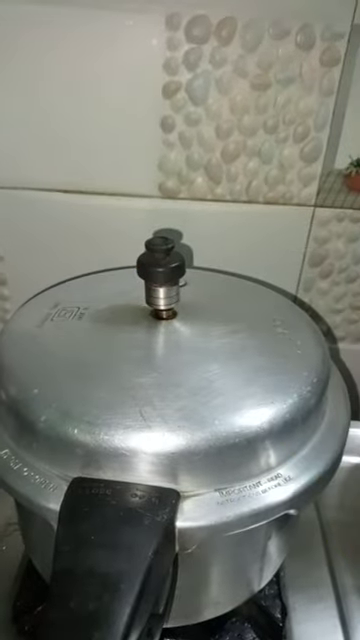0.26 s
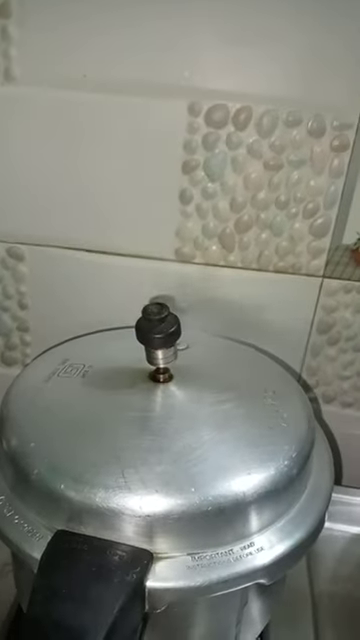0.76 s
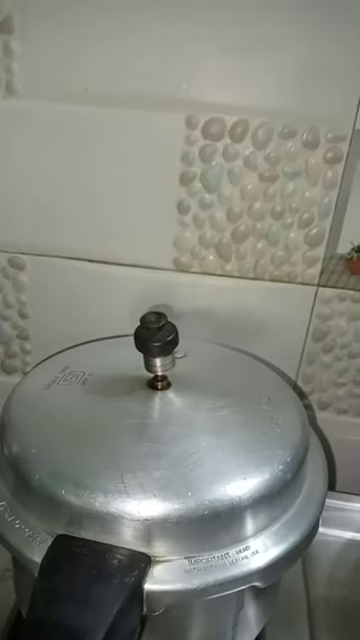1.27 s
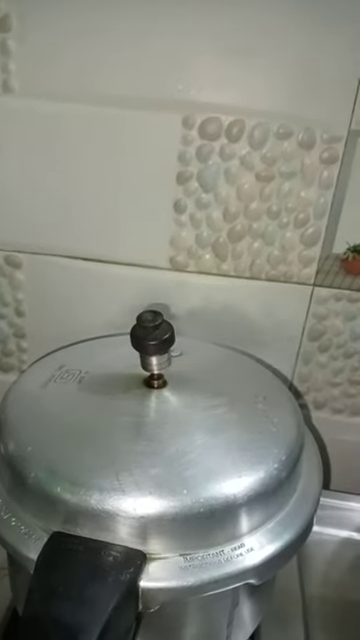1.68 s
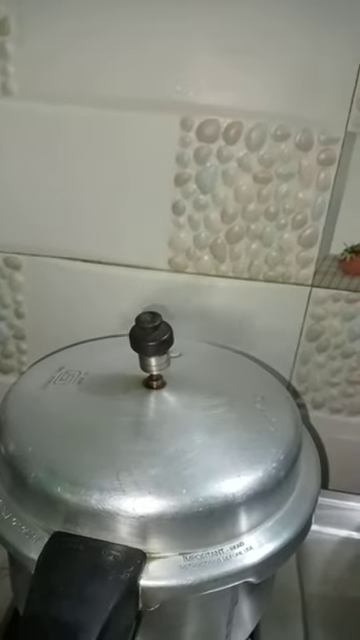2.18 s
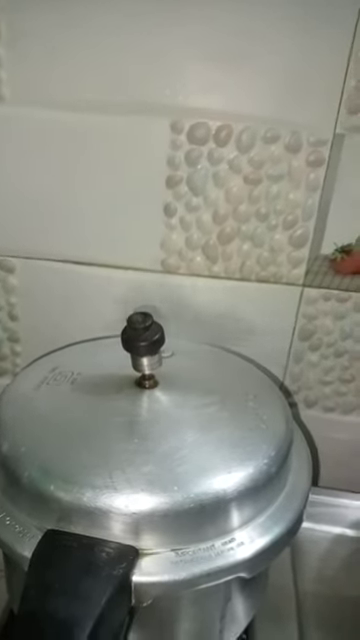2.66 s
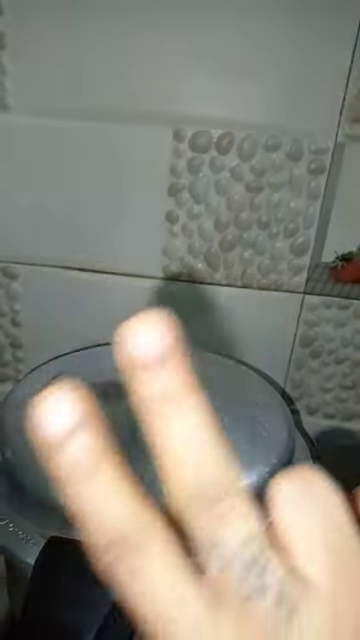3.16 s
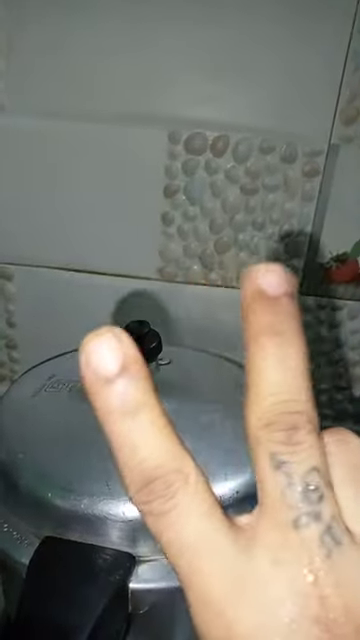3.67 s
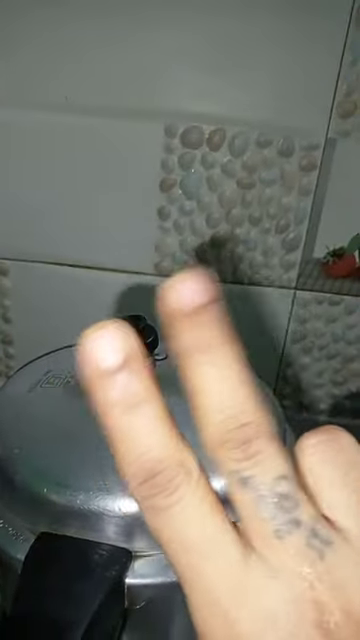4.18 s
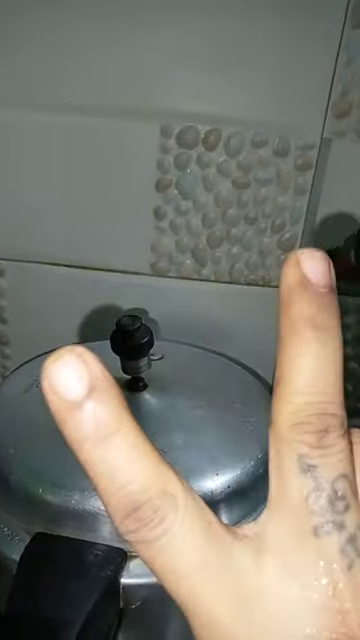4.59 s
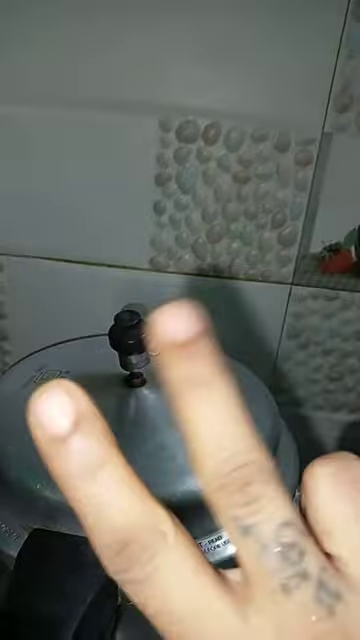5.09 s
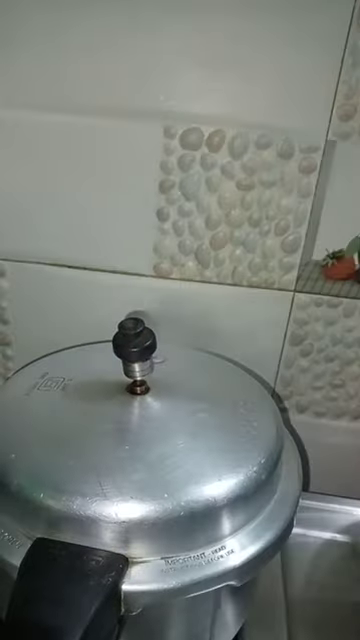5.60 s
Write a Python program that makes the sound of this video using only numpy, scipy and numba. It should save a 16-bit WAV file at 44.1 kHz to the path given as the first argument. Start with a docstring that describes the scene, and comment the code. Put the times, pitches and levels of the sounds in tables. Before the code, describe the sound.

In a small tiled kitchen, a soft simmer hiss and low fan hum last just over half a second. Then a pressure cooker's weight lifts and steam blasts out abruptly. The first rush crackles and pops violently on the close microphone, almost overloading, then eases into a continuous bright hiss with irregular wind thumps until the end, where it is still blowing.

```python
"""A pressure cooker simmers softly in a tiled kitchen under a humming fan: shaped noise and wavering tones.
At 0.63 s its weight lifts and steam jets out: noise hisses through the resonances of vent and weight.
The first rush pops hard at the microphone and churns the air there, most strongly near 0.9 s.
The hiss then goes on, rising and falling, while gusts keep hitting the microphone port.
Each gust is made of sudden pressure jumps, which the bass cut turns into pops."""
import sys
import numpy as np
from scipy import signal
from scipy.fft import rfft, irfft, next_fast_len
from scipy.io import wavfile
from scipy.ndimage import uniform_filter1d
from numba import njit

SR = 44100
rng = np.random.default_rng(int(sys.argv[2]) if len(sys.argv) > 2 else 0)


def wav_out(sig):
    """Save sig, one row per channel (or a flat mono array), as 16-bit PCM at SR to the path in sys.argv[1]."""
    wavfile.write(sys.argv[1], SR, np.round(np.clip(np.atleast_2d(sig).T, -1, 1) * 32767).astype(np.int16))


N = 257984
T = np.arange(N) / SR  # time in seconds
LIFT_S = .6335  # the weight lifts
BLAST_FALL_DB_S = 52.5  # how fast the first rush dies away
BASS_CUT_HZ = 84.7


def jet(swell_db=.5, flicker_db=1.0, spit_db=0.7, wander_db=1.0):
    """Turbulent steam: noise bands swell together, flicker alone, and the flow spits at a fast rate."""
    # strength of the hiss above 5.5 kHz: t/s, level/dB
    strength = [(0.64, -26), (0.83, -28.5), (1.18, -29), (1.32, -23.5), (1.48, -28.5), (1.64, -24.5),
                (1.86, -28), (2.03, -26.5), (2.16, -29), (2.26, -25.5), (2.53, -27.5), (2.56, -31.5),
                (2.66, -24.5), (2.7, -27), (2.99, -27.5), (5.31, -27), (5.33, -29.5), (5.41, -25.5),
                (5.59, -26), (5.85, -25)]
    # tone colour given by the resonances of vent and weight: f/Hz, relative level per Hz/dB
    colour = [(250, -16.5), (900, -14.5), (2750, -5), (3050, -1), (3500, 2), (4200, -3), (4800, -14.5),
              (6200, -11.5), (7200, 1.5), (7750, 0), (8700, -10), (11100, -9.5), (11550, -15.5),
              (11950, -10.5), (13400, -12), (15300, -3)]
    # dB that the high side of the low resonance, its level and the upper one move per dB of hiss
    lean_follow, low_follow, upper_follow = 0.72, 0.63, 1.18
    start_lean_db, lean_settle_s = -4, 0.81  # the low resonance starts tipped to its low side

    times, levels = np.transpose(strength)
    level_db = np.interp(T, times, levels)
    surge_db = level_db - np.median(level_db)
    settling_db = start_lean_db * np.exp(-np.maximum(T - LIFT_S, 0) / lean_settle_s)
    high_side_db = settling_db + lean_follow * surge_db + wander_db * walk(8)
    shared_db = swell_db * walk(9.8) + spit_db * walk(300)
    hiss = 0
    for hz, band in bands(colour, 5500, 15400, count=26):
        # opposite changes on the two flanks tip the low resonance
        flank = np.interp(hz, [2500, 3100, 3500, 3900, 4400, 5200], [0, -.6, 0, 1, 1, 0])
        low_share = np.interp(hz, [4800, 5700], [1, 0])
        upper_share = np.interp(hz, [5700, 6800, 8300, 9300], [0, 1, 1, 0])
        # each resonance follows the flow in its own measure
        band_db = flank * high_side_db
        band_db = band_db + low_share * (low_follow - 1) * surge_db
        band_db = band_db + upper_share * (upper_follow - 1) * surge_db
        hiss = hiss + band * undb(band_db + flicker_db * walk(14))
    opening = np.clip((T - LIFT_S) / 0.0012, 0, 1)
    return hiss * undb(level_db + shared_db) * opening


def tiles(x):
    """Sound bounces off lid, tiles and counter: a few strong echoes and a short dense tail."""
    # echoes: delay/ms, level against the direct sound/dB
    echoes = [(1.0, -41), (1.6, -25), (2.3, -41), (3.95, -20), (6.3, -22), (8.0, -21.5), (16.5, -29)]
    t60_s, tail_db = 0.07, -12.5  # time to fall by 60 dB; whole tail against the direct sound
    t = np.arange(SR // 4) / SR
    response = rng.standard_normal(len(t)) * np.exp(-np.log(1000) * t / t60_s) * (t > .003)
    response = response / np.linalg.norm(response) * undb(tail_db)
    response[0] = 1  # the direct sound
    for ms, db in echoes:
        response[int(ms * SR / 1000)] += undb(db)
    return signal.fftconvolve(x, response)[:N]


def gusts(small_db=-4.0, patchy_db=1.5):
    """Moving air presses on the microphone port: held jumps, brief flicks, hard pops and a rumble."""
    # gusts, before the trims below: start t/s, length/s, level/dB
    gust_table = [(0.631, 0.56, -17), (1.21, 0.059, -24), (1.315, 0.051, -22), (1.424, 0.16, -23.5),
                  (1.647, 0.073, -26.5), (1.77, 0.066, -19.5), (1.936, 0.025, -20.5), (2.022, 0.051, -20.5),
                  (2.085, .12, -19.5), (2.265, 0.025, -20.5), (2.347, 0.099, -24.5), (2.489, 0.074, -22),
                  (2.623, 0.19, -24), (2.945, 0.094, -26), (3.054, 0.28, -22), (3.428, 0.13, -26.5),
                  (3.591, 0.032, -24.5), (3.88, 0.026, -31), (4.03, 0.18, -28), (4.213, 0.053, -28.5),
                  (4.383, .04, -28), (4.709, 0.093, -23.5), (4.858, 0.018, -24.5), (4.946, 0.077, -18),
                  (5.067, 0.023, -21.5), (5.284, 0.073, -23), (5.376, 0.018, -26), (5.455, .08, -26),
                  (5.563, 0.17, -19), (5.778, 0.045, -23)]
    rise_db_s, fall_db_s, lull_db = 300., 353, -36.5
    rush_db, rush_end_s = -22.5, 1  # flicks in the first rush
    flick_db, flick_follow = -28., 0.65  # level in a -20 dB gust; dB moved per dB of gust

    gust_db = lull_db
    for start, length, db in gust_table:
        gust_db = np.maximum(gust_db, swell(start, start + length, db, rise_db_s, fall_db_s))
    # patchy air after the lift; practically silent before it
    patch_db = np.where(T > LIFT_S, patchy_db * walk(25.055), -120)
    held_db = gust_db + small_db + patch_db
    held = eddies(150., 3.63, 6.1, 40., held_db)

    # flicks follow the gusts and crackle harder in the first rush
    brief_db = flick_db + flick_follow * (gust_db + 20)
    rush = swell(LIFT_S, rush_end_s, rush_db, rise_db_s, BLAST_FALL_DB_S)
    brief_db = np.maximum(brief_db, rush) + patch_db

    # a jump takes a tenth of a millisecond to build
    edge = signal.bessel(4, 3000., norm="mag", fs=SR, output="sos")
    return signal.sosfilt(edge, held + flicks(brief_db) + pops() + rumble(held_db))


def flicks(level_db):
    """A small vortex pushes, then pulls: the low cut makes one rounded swing of each brief jump."""
    jumps = eddies(450., 4.5, 0.049, 0.26, level_db)
    return signal.sosfilt(signal.butter(2, 330., "high", fs=SR, output="sos"), jumps)


def pops():
    """Hard single pressure jumps on the port, each sinking back at its own rate."""
    # jumps ahead of the filters: t/s, signed size (1 = full scale), time to sink to about a third/ms
    jumps = [(0.6337, -0.49, 40), (0.6498, 0.5, 40), (0.701, -0.63, 0.3), (0.706, -0.47, 0.3),
             (0.7211, -0.95, 0.3), (0.741, 0.94, 0.27), (0.7564, -0.78, 0.3), (0.7626, 0.88, 0.3),
             (0.777, -0.65, 40), (0.788, -0.96, 0.3), (0.793, 0.97, 1), (0.87, -0.4, 40), (0.8813, 0.53, 1),
             (0.8916, 0.57, 3), (0.9053, -0.7, 3), (0.9447, -0.61, 0.3), (0.9667, 0.73, 0.84),
             (0.9762, -1.3, 0.3), (1.008, -0.77, 0.3), (1.018, 0.69, 1), (1.096, -0.73, 0.32),
             (1.146, -0.47, 1), (1.1576, -0.51, 0.3), (1.2244, 0.76, 0.3), (1.277, 0.34, 3),
             (1.323, 0.56, 3), (1.352, -0.38, 40), (1.4387, -0.26, 3.6), (1.4535, 0.37, 40),
             (1.486, -0.35, 3), (1.516, -0.49, 40), (1.592, 0.39, 40), (1.7937, 0.33, 40),
             (1.799, -0.47, 40), (1.823, 0.64, 3.3), (1.8413, -0.46, 2.6), (1.934, 0.43, 1),
             (1.9462, -0.62, 40), (2.03, -0.5, 40), (2.0386, 0.63, 40), (2.048, -0.65, 3),
             (2.0917, -0.69, 3), (2.1024, 0.64, 40), (2.1147, -0.49, 40), (2.125, -0.41, 40),
             (2.1508, 0.4, 1), (2.174, -0.58, 40), (2.2735, -0.37, 40), (2.398, 0.33, 3), (2.443, 0.67, 40),
             (2.49, -0.38, 40), (2.519, -0.63, 3), (2.5233, 0.62, 0.27), (2.539, 0.37, 3),
             (2.5451, 0.77, 1), (2.6813, 0.41, 40), (2.7165, 0.31, 40), (2.789, 0.54, 40),
             (3.011, 0.39, 0.27), (3.1091, 0.33, 3), (3.1994, 0.52, 3), (3.2433, -0.34, 40),
             (3.2596, -0.63, 0.3), (3.2771, 0.26, 40), (3.3027, 0.53, 40), (3.309, -0.38, 40),
             (3.4394, -0.34, 40), (3.5359, 0.31, 40), (3.597, -0.48, 40), (3.6103, 0.38, 40),
             (4.135, 0.37, 40), (4.2178, 0.48, 0.25), (4.228, 0.26, 3), (4.251, 0.2, 40),
             (4.4061, -0.34, 40), (4.72, -0.31, 40), (4.741, 0.65, 40), (4.8047, 0.58, 40),
             (4.946, -0.39, 40), (4.953, 0.42, 3), (4.9733, 0.63, 40), (4.9903, 0.71, 40),
             (4.9976, -0.56, 40), (5.0184, 0.48, 40), (5.024, -0.36, 40), (5.072, 0.38, 40),
             (5.0791, -0.48, 3), (5.0836, 0.44, 40), (5.314, -0.33, 0.92), (5.3187, 1, 40),
             (5.5668, -0.45, 40), (5.5746, 0.34, 40), (5.6545, 0.52, 40), (5.6684, -0.33, 40),
             (5.7005, -0.48, 40), (5.716, 0.6, 40)]
    at, size, hold_ms = np.transpose(jumps)
    at = (at * SR).astype(int)
    kicks, holds = np.zeros(N), np.ones(N)
    kicks[at] = size
    holds[at] = hold_ms * SR / 1000
    return relax(kicks, holds)


def rumble(level_db, rumble_db=-11.5):
    """Slow uneven air pressure: noise summed up with a slow leak, which leaves mostly bass."""
    noise = signal.lfilter([1], [1, -.995], rng.standard_normal(N))
    noise = noise / np.std(bass_cut(noise))
    return noise * undb(level_db + rumble_db + 4.8 * walk(60))


def blast(peak_s=0.887, peak_db=-15.5, rise_db_s=45.):
    """The first blast churns the air at the port: dense rounded swirls peak, then fade."""
    level_db = swell(peak_s, peak_s, peak_db, rise_db_s, BLAST_FALL_DB_S)
    swirls = eddies(350., 2.2, 0.4, 2.1, np.where(T > LIFT_S, level_db, -120))
    return signal.sosfilt(signal.butter(2, [220., 1300.], "band", fs=SR, output="sos"), swirls)


def kitchen():
    """Flame and leaking steam hiss softly as noise; the fan motor hums on wavering tones."""
    # colour of flame, leak and room: f/Hz, relative level per Hz/dB
    simmer = [(40, -8), (75, -11), (130, -5), (190, -14), (336, -6.5), (486, -10.5), (2080, -17.5),
              (3490, -10), (4680, -26), (7700, -19.5), (11100, -36), (15500, -21)]
    # fan motor tones, multiples of its turning: f/Hz, rms level before wavering and ahead of the jet/dB
    fan = [(91.3, -46), (114, -54), (137, -44.5), (160, -55.5), (183, -62), (205, -63), (228, -61),
           (342, -58), (502, -60), (525, -62), (568, -62), (594, -61), (639, -61)]
    simmer_db, under_jet_db = -43, -22  # hiss level; how far everything here sinks once the jet blows

    hiss = 0
    for _, band in bands(simmer, 420, 13200, count=8):
        hiss = hiss + band * undb(walk(11))
    hum = 0
    for hz, db in fan:
        waver_db, drift = 1.5 * walk(9), .4 * walk(10)  # drift of the phase in radians
        tone = np.sin(2 * np.pi * (hz * T + rng.random()) + drift)
        hum = hum + undb(db + waver_db) * np.sqrt(2) * tone
    sink_db = np.interp(T, [LIFT_S, LIFT_S + .1], [0, under_jet_db])
    return (undb(simmer_db) * hiss + hum) * undb(sink_db)


def eddies(per_s, spread_db, short_ms, long_ms, level_db):
    """Random pressure jumps either way, many small and few large, each sinking back."""
    chance, rarity, sign, hold = rng.random((4, N))
    size = undb(spread_db * np.minimum(-np.log(1 - rarity), 3.)) * np.sign(sign - .5)
    kicks = (chance < per_s / SR) * size
    holds = short_ms * (long_ms / short_ms) ** hold * SR / 1000
    # scaled by the spread that the steady jumps have behind the bass cut
    return relax(kicks * undb(level_db), holds) / np.std(bass_cut(relax(kicks, holds)))


@njit
def relax(kicks, holds):
    """Each kick is a pressure jump that sinks back at the rate of its own hold, in samples."""
    out = np.zeros(N)
    for i in range(N):
        if kicks[i] != 0:
            keep, v = np.exp(-1 / holds[i]), kicks[i]
            for j in range(i, min(N, i + int(6 * holds[i]))):
                out[j] += v
                v *= keep
    return out


def swell(start, end, peak_db, rise_db_s, fall_db_s):
    """Level in dB that climbs to a peak, holds from start to end and falls away."""
    below_db = np.maximum((start - T) * rise_db_s, (T - end) * fall_db_s)
    return peak_db - np.maximum(below_db, 0)


def bands(colour, lo_hz, hi_hz, count):
    """Coloured noise split into overlapping bands; together 0 dB between lo_hz and hi_hz."""
    size = next_fast_len(N)
    hz = np.maximum(np.arange(size // 2 + 1) * SR / size, 1)
    colour_hz, colour_db = np.transpose(colour)
    gain = undb(np.interp(np.log(hz), np.log(colour_hz), colour_db))
    spec = rfft(rng.standard_normal(size)) * gain
    spec = spec / np.std(irfft(spec * (hz > lo_hz) * (hz < hi_hz), size))
    # centres lie closer together at the bottom
    centres = np.linspace(0, SR / 2, count) * np.linspace(.3, .72, count)
    for centre, row in zip(centres, np.eye(count)):
        yield centre, irfft(spec * np.interp(hz, centres, row), size)[:N]


def walk(rate):
    """Random wandering around zero: levels held for 1 / rate s, smoothed twice; rms 1."""
    k = int(SR / rate)
    steps = np.repeat(rng.standard_normal(N // k + 1), k)
    return unit(uniform_filter1d(uniform_filter1d(steps, k), k)[:N])


def unit(x):
    """Scale to an rms of 1."""
    return x / np.sqrt(np.mean(x ** 2))


def undb(db):
    """Turn dB into a factor."""
    return 10 ** (np.asarray(db) / 20)


def bass_cut(x):
    """The microphone's high-pass turns each pressure jump into a pop with a short swing."""
    return signal.sosfilt(signal.butter(3, BASS_CUT_HZ, "high", fs=SR, output="sos"), x)


@njit
def follow(x, keep):
    """Peak follower: jumps up at once, sinks slowly."""
    out, e = np.empty(len(x)), 0.
    for i in range(len(x)):
        e = max(abs(x[i]), e * keep)
        out[i] = e
    return out


def scene():
    """Jet with its echoes, moving air and kitchen add up at one microphone."""
    return (tiles(jet()) + gusts() + blast() + kitchen())[None, :]


def record(dry):
    """Bass cut, a further gentle low cut, gain control, rounded peaks, top cut."""
    top_db, ratio, release_s = -8, 1.52, 0.057  # peaks over the top pull the gain down, which creeps back
    x = signal.lfilter(*signal.butter(1, 60., "high", fs=SR), bass_cut(dry[0]))
    over = np.maximum(follow(x, np.exp(-1 / (release_s * SR))) / undb(top_db), 1)
    gain = over ** (1 / ratio - 1)
    lag = np.exp(-1 / (0.0088 * SR))  # the gain needs some milliseconds to react
    x = x * signal.lfilter([1 - lag], [1, -lag], gain, zi=[lag])[0]
    x = x / (1 + (x / .9) ** 4) ** .25  # peaks round off towards 0.9
    return signal.sosfilt(signal.ellip(12, .2, 85, 15520, fs=SR, output="sos"), x)[None, :]


dry = scene()
out = record(dry)
wav_out(out)
```